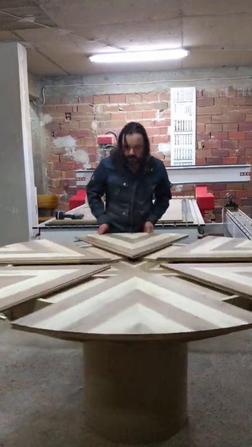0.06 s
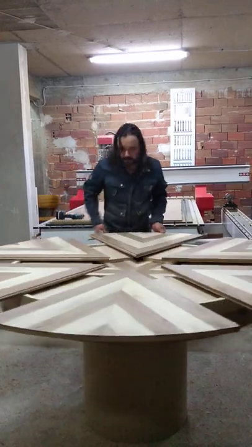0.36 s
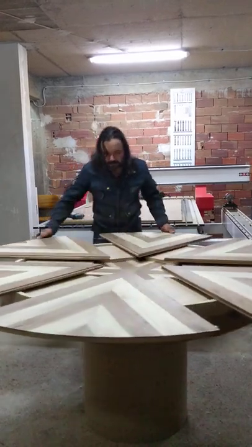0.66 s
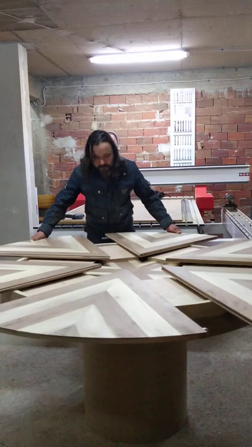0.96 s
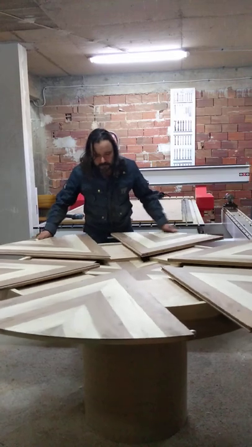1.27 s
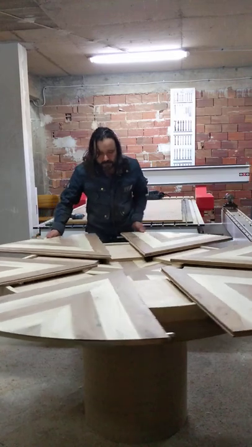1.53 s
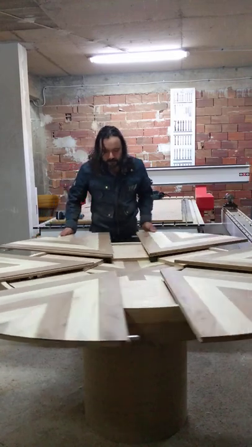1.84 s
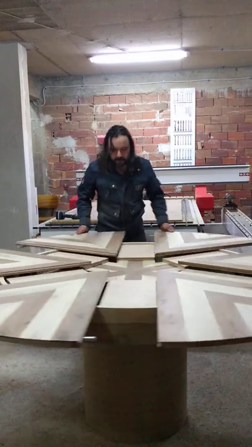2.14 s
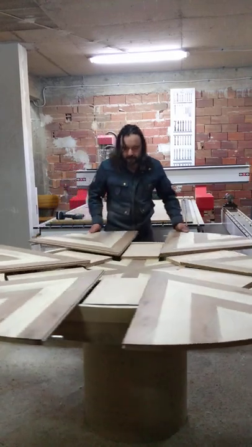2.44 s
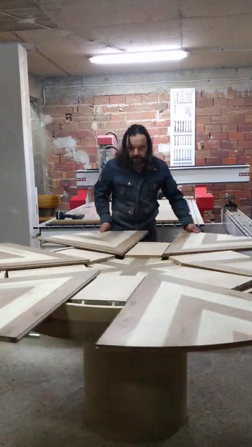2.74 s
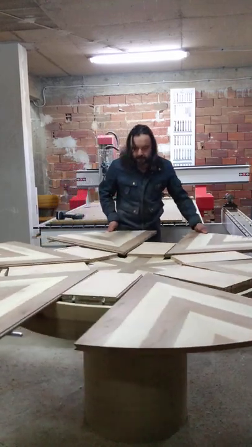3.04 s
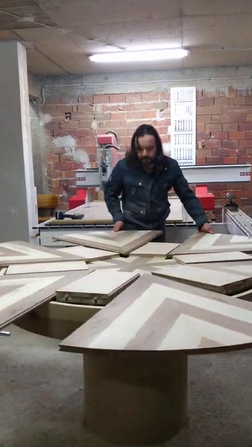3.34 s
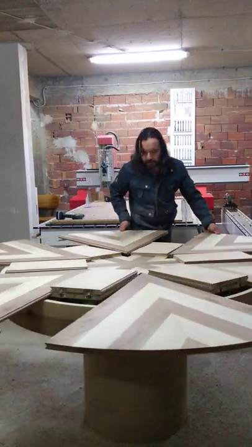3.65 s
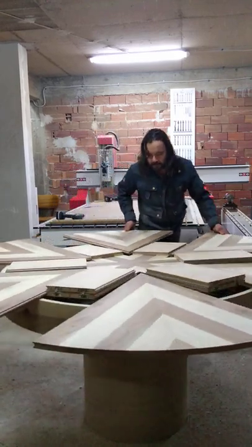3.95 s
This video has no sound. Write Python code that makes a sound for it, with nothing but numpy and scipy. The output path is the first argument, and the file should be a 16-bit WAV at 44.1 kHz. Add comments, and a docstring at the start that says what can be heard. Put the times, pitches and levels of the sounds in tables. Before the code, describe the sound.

Wooden table panels rumble and scrape as they are pushed apart and turned by hand.

```python
"""The runners of an expanding round table rumble as its wooden panels are pushed apart and turned by hand.
Small bumps ring the table's resonances and joints jolt it. Wood scrapes and hisses on wood, loose
panels knock, and the metal guides rasp, tick with grit and squeak faintly. It all sounds in a brick
workshop over quiet room noise, through two close microphones and a stereo widening circuit."""
import sys
import numpy as np
from scipy import signal
from scipy.fft import rfft, irfft
from scipy.io import wavfile
from scipy.ndimage import uniform_filter1d

SR = 44100
rng = np.random.default_rng(int(sys.argv[2]) if len(sys.argv) > 2 else 0)


def transcribe(signal):
    """Save signal, clipped to [-1, 1], as a 16-bit WAV file at the path in sys.argv[1]."""
    frames = np.atleast_2d(signal).T
    limited = np.clip(frames, -1, 1)
    pcm = np.round(limited * 32767).astype(np.int16)
    wavfile.write(sys.argv[1], SR, pcm)


N = 176400
T, HZ = np.arange(N) / SR, np.fft.rfftfreq(2 * N, 1 / SR)


def amp(db):
    """Decibels to gain."""
    return 10 ** (np.asarray(db) / 20)


def unit(x):
    """Scales to rms 1."""
    return x / np.sqrt(np.mean(x ** 2) + 1e-20)


def curve(points, hz=HZ):
    """Reads a table on a log-frequency axis."""
    f, value = np.transpose(points)
    return np.interp(np.log(hz + 1), np.log(f + 1), value)


def fader(points):
    """A level ride in dB as gain per sample."""
    return amp(np.interp(T, *np.transpose(points)))


def add(mix, start_s, sound):
    """Mixes a sound in at a time."""
    part = mix[max(round(start_s * SR), 0):][:len(sound)]
    part += sound[:len(part)]


def eq(x, response):
    """Filters by a frequency response."""
    return irfft(rfft(x, 2 * N) * response)[..., :N]


def colour(points):
    """Minimum-phase response of an EQ curve, scaled to rms 1."""
    log_gain = np.log(amp(curve(points, np.fft.rfftfreq(8192, 1 / SR))))
    mirrored = np.r_[log_gain, log_gain[-2:0:-1]]
    response = np.exp(np.conj(signal.hilbert(mirrored))[:len(log_gain)])
    impulse = irfft(response)[:len(log_gain)]
    return unit(rfft(impulse, 2 * N))


def grains(per_s, spread_db):
    """Random tiny impacts of uneven size from all round the table, as mid and side."""
    chance, size = rng.random((2, 2, N))
    hit, out = chance < per_s / SR, np.zeros((2, N))
    signed = 2 * size[hit] - 1
    accent = np.minimum(-np.log(abs(signed) + 1e-9), 4)
    out[hit] = np.sign(signed) * amp(spread_db * accent)
    return unit(out)


def wander(n, smooth_samples):
    """Smooth random drift of rms about 1."""
    return unit(uniform_filter1d(rng.standard_normal(SR), size=smooth_samples))[:n]


def bursts(events, attack_s, decay_s):
    """Envelope of short hits with a linear attack and an exponential decay."""
    out, t = np.zeros(N), T[:SR // 2]
    for start_s, db in events:
        add(out, start_s, amp(db) * np.minimum(t / attack_s, 1) * np.exp(-t / decay_s))
    return out


# tone of the noise bed (frequency [Hz], relative gain [dB])
ROOM_TONE_EQ = [(20, -19), (60, 14), (170, 11), (400, -2), (1000, -31.5), (2000, -16), (3800, -23),
                (6000, -33.5), (10500, -23.5), (14000, -23.5)]
HISS_HZ, HISS_HALF_WIDTH_HZ, HISS_BOOST_DB, FLUTTER_DB = 4470, 390, 24.5, 2.8
ROOM_TONE_DB = -67.5


def room_tone():
    """A low, steady bed of noise with a narrow band of hiss that flutters."""
    boost_db = HISS_BOOST_DB / (1 + ((HZ - HISS_HZ) / HISS_HALF_WIDTH_HZ) ** 2)
    air = amp(curve(ROOM_TONE_EQ))
    white = rng.standard_normal((2, N))
    flutter = amp(FLUTTER_DB * unit(uniform_filter1d(rng.standard_normal(N), size=1200)))
    hiss = flutter * eq(white, air * (amp(boost_db) - 1))
    return amp(ROOM_TONE_DB) * unit(eq(white, air) + hiss)


# reverb time of the workshop (frequency [Hz], T60 [s])
REVERB_TIME = [(100, 0.35), (1000, 0.14), (5000, 0.12), (14000, 0.41)]
PREDELAY_S, REVERB_DB = 0.00341, -7


def workshop(direct):
    """Direct sound plus a short, soft tail off the brick walls, fed from the mid signal."""
    hz, t, spectrum = signal.stft(rng.standard_normal((2, SR)), SR, nperseg=256)
    decay = amp(-60 * t / curve(REVERB_TIME, hz)[:, None])
    tail = signal.istft(spectrum * decay, SR, nperseg=256)[1][:, :SR] * (T[:SR] > PREDELAY_S)
    tail /= np.linalg.norm(tail, axis=1, keepdims=True)
    wet = signal.fftconvolve(direct[:1], tail, axes=1)[:, :N]
    return direct + amp(REVERB_DB) * wet


# faint squeak cues (time [s], length [s], pitch [Hz], level [dB])
SQUEAK_CUES = [(.79, .14, 2850, -79), (0.893, 0.072, 2710, -74.5), (0.994, 0.067, 3200, -74),
               (1.84, .06, 3330, -77), (2.604, 0.115, 3580, -74.5), (2.72, 0.21, 3550, -85),
               (2.853, 0.09, 3610, -72.5), (2.92, 0.156, 3480, -80.5)]
SQUEAK_WAVER, SQUEAK_SAG_HZ_PER_S = .009, 700


def guide_squeaks():
    """The guides stick and slip in thin whistles that waver and sag in pitch."""
    out = np.zeros(N)
    for start_s, length, hz, db in SQUEAK_CUES:
        n = int(length * SR)
        sag = SQUEAK_SAG_HZ_PER_S * (T[:n] - length / 2)
        pitch = hz * (1 + SQUEAK_WAVER * wander(n, smooth_samples=300)) - sag
        swell = np.sqrt(2 * np.hanning(n))
        add(out, start_s, amp(db) * swell * np.sin(2 * np.pi * np.cumsum(pitch) / SR))
    return out


# gritty tick cues (time [s], level [dB])
TICK_CUES = [(.005, -68), (.14, -66), (.19, -70), (.352, -68), (.52, -77), (.595, -71), (.86, -79),
             (1.155, -72), (1.408, -77), (1.512, -79), (1.66, -78), (1.735, -72), (1.968, -67),
             (2.512, -69), (2.595, -76), (3.262, -73), (3.805, -82), (3.895, -74.5)]
# bright tone of the grit (frequency [Hz], relative gain [dB])
TICK_EQ = [(20, -39), (2500, -18), (5500, -3.5), (8000, -3.5), (11000, -1), (14000, -10)]


def grit_ticks():
    """Grit in the guides crunches in little bursts of tiny impacts."""
    grit = grains(per_s=5000, spread_db=2)
    return eq(grit * bursts(TICK_CUES, attack_s=.012, decay_s=.042), colour(TICK_EQ))


# resonances of the metal guides (frequency [Hz], width [Hz], gain [dB])
GUIDE_MODES = [(2823, 820, -25), (4460, 340, -21)]
RASP_FOLLOW = 0.75  # dB of rasp per dB of rumble


def guide_rasp():
    """The metal guides rasp in narrow bands as the runners roll, riding the rumble's level."""
    grit = grains(per_s=4600, spread_db=2) * fader(RUMBLE_RIDE) ** RASP_FOLLOW
    bands = sum(amp(db) / (1 + 2j * (HZ - hz) / width) ** 2 for hz, width, db in GUIDE_MODES)
    return eq(grit, bands)


# a panel breaks free and rattles to rest, later ones catch lightly (time [s], clack [dB], thud [dB])
KNOCK_CUES = [(.087, -56.5, -67), (.102, -64, -62), (.123, -63, -58), (.154, -65.5, -60), (.186, -69, -65),
              (.258, -75, -67), (2.102, -70, -69), (2.175, -80, -70), (2.36, -73, -71), (3.745, -84, -85)]
# hollow tone of the panel (frequency [Hz], relative gain [dB])
CLACK_EQ = [(20, -52), (80, -34), (170, -9), (350, -2), (500, -3), (740, -1), (850, -2), (970, 5),
            (1120, -3), (1400, -7), (1900, -22), (4000, -42), (15000, -60)]
# dull tone of the frame (frequency [Hz], relative gain [dB])
THUD_EQ = [(20, -48), (80, -26), (150, -2), (260, -1), (400, 4), (470, -10), (600, -2), (760, -5),
           (1100, -20), (2000, -42), (15000, -70)]


def panel_knocks():
    """A loose panel strikes: a sharp clack of its own, then a softer thud of the frame beneath."""
    clack, thud = rng.standard_normal((2, 2, N))
    clack *= bursts([(s, db) for s, db, _ in KNOCK_CUES], attack_s=.00037, decay_s=.026)
    thud *= bursts([(s, db) for s, _, db in KNOCK_CUES], attack_s=.003, decay_s=.03)
    return eq(clack, colour(CLACK_EQ)) + eq(thud, colour(THUD_EQ))


# fader ride of the panels' scrape (time [s], level [dB])
SCRAPE_RIDE = [(0, -48.5), (.08, -50.5), (.11, -54), (.2, -48), (.45, -53.5), (.53, -57.5), (.8, -58.5),
               (1.12, -67.5), (1.53, -61.5), (1.72, -58.5), (1.95, -52.5), (2.2, -56), (2.52, -60),
               (2.62, -60.5), (2.84, -60), (3.15, -65), (3.6, -70.5), (4, -66)]
# woody tone of the scrape (frequency [Hz], relative gain [dB])
SCRAPE_EQ = [(20, -42), (90, -19.5), (250, 3.5), (470, -3.5), (600, -7.5), (680, -4), (780, -4), (860, -4),
             (950, -6.5), (1150, -7.5), (1350, -11), (1700, -15), (2300, -10.5), (4000, -41.5),
             (15000, -37.5)]
# fader ride of the dry surface rub (time [s], level [dB])
RUB_RIDE = [(0, -66), (.2, -66), (.43, -62.5), (.52, -70), (.9, -70), (1.1, -75.5), (1.55, -73.5),
            (1.92, -68), (2.35, -72), (2.55, -72), (3.05, -74), (3.3, -75.5), (3.7, -80), (4, -76.5)]
# airy tone of the rub (frequency [Hz], relative gain [dB])
RUB_EQ = [(20, -9), (1000, 0.5), (1900, -0.5), (2850, -1), (3800, -1), (5200, -4), (7000, -6.5),
          (10500, -10), (14000, -20.5)]
SCRAPE_TRIM_DB, RUB_TRIM_DB = -11.5, -1


def sliding_panels():
    """Wood grain catches and slips: a hollow scrape in the panels and a dry hiss at the surface."""
    scrape = eq(grains(per_s=4600, spread_db=2) * fader(SCRAPE_RIDE), colour(SCRAPE_EQ))
    rub = eq(grains(per_s=7100, spread_db=2) * fader(RUB_RIDE), colour(RUB_EQ))
    return amp(SCRAPE_TRIM_DB) * scrape + amp(RUB_TRIM_DB) * rub


# runners jolting over joints (time [s], half length [s], level [dB], pitch [Hz])
JOLT_CUES = [(.015, 0.013, -56, 283), (.228, 0.09, -35.5, 235.2), (.447, 0.025, -37, 276),
             (.58, 0.042, -45, 232), (.683, 0.069, -39, 304), (.89, .042, -49, 204), (.99, 0.022, -49, 202),
             (1.42, 0.029, -51.5, 313), (1.9, 0.049, -45, 163), (1.96, 0.041, -41.5, 217.3),
             (2.17, 0.039, -49, 548), (2.315, 0.039, -39.5, 261), (2.39, 0.076, -40.5, 171.3),
             (2.6, 0.047, -38.5, 169), (2.835, 0.041, -42, 163.4), (2.842, 0.05, -43.5, 322),
             (3.05, 0.018, -55, 175), (3.21, .06, -57.5, 189), (3.735, 0.041, -54, 160)]
JOLT_DRIFT_HZ = 10


def runner_jolts():
    """A runner jolts over each joint: a brief low shudder around one pitch."""
    out = np.zeros(N)
    for start_s, half_length, db, hz in JOLT_CUES:
        t = np.arange(0, 2 * half_length, 1 / SR)
        pitch = hz + JOLT_DRIFT_HZ * wander(len(t), smooth_samples=200)
        peak_s = half_length / 3
        swell = t / peak_s * np.exp(1 - t / peak_s)
        add(out, start_s, amp(db) * swell * np.sin(2 * np.pi * np.cumsum(pitch) / SR))
    return out


# fader ride of the rumble over two pushes (time [s], level [dB])
RUMBLE_RIDE = [(0, -44.5), (.11, -44.5), (.3, -45.5), (.47, -45.5), (.54, -49.5), (.75, -50.5),
               (.95, -58.5), (1.12, -62), (1.3, -61.5), (1.5, -56), (1.73, -54), (1.82, -47.5),
               (1.95, -45.5), (2.4, -47.5), (2.52, -50), (2.6, -47.5), (2.72, -48.5), (2.88, -49),
               (2.98, -52), (3.08, -54), (3.11, -62), (3.56, -66.5), (4, -63)]
# table resonances (frequency [Hz], width [Hz], relative gain closed [dB], relative gain open [dB])
TABLE_MODES = [(59, 14, -19, -22), (93, 13, -11, -9.5), (127, 12, 2.5, 0), (165, 11, 5.5, 9.5),
               (233, 20, 5.5, 0), (298, 10, 1.5, -7), (334, 22, -6, -2), (390, 18, -6, -9),
               (534, 22, -12, -7), (610, 60, -14, -13), (755, 50, -18, -18), (945, 50, -16, -25)]
# broad low body under the resonances (frequency [Hz], relative gain [dB])
BODY_EQ = [(20, -47.5), (80, -38.5), (140, -4.5), (250, -9), (370, -13), (480, -19), (1000, -54),
           (3000, -102)]
OPENING_START_S, OPENING_END_S = 0.78, 2.2
BUMPS_PER_S, BUMP_SPREAD_DB = 700, 1.5
RING_TRIM_DB, BODY_TRIM_DB = 0.5, -3.5


def runner_rumble():
    """Small bumps under the runners ring the table, whose tone shifts as the panels move out."""
    opened = np.interp(T, [OPENING_START_S, OPENING_END_S], [0, 1])
    bumps, ring = grains(BUMPS_PER_S, BUMP_SPREAD_DB), 0
    for k, (hz, width, closed_db, open_db) in enumerate(TABLE_MODES):
        # a second, broad band-pass steepens the skirts of each resonance
        resonator = [np.concatenate(signal.iirpeak(hz, q, SR)) for q in (hz / width, 2)]
        gain = amp(closed_db) * (1 - opened) + amp(open_db) * opened
        ring = ring + (-1) ** k * gain * signal.sosfilt(resonator, bumps)
    body = eq(grains(BUMPS_PER_S, BUMP_SPREAD_DB), colour(BODY_EQ))
    return fader(RUMBLE_RIDE) * (amp(RING_TRIM_DB) * unit(ring) + amp(BODY_TRIM_DB) * unit(body))


# stereo width at the microphones (frequency [Hz], side gain [dB])
SIDE_EQ = [(40, 6.5), (90, -1), (160, -15), (250, -13), (340, -5.5), (450, -6), (620, -7.5), (1000, -1),
           (1500, 3), (2300, -2.5), (4300, 1), (14000, -0.5)]


def scene():
    """The table in the workshop over room tone, as left and right at two close microphones."""
    table = runner_rumble() + sliding_panels() + guide_rasp() + panel_knocks() + grit_ticks()
    table[0] += runner_jolts() + guide_squeaks()  # mid only: dead centre
    mid, side = workshop(table) + room_tone()
    side = eq(side, amp(curve(SIDE_EQ)))
    return np.array([mid + side, mid - side])


# microphone imbalance (frequency [Hz], left over right [dB])
MIC_BALANCE = [(40, -7), (170, -0.5), (500, -2.5), (1200, 0.5), (3000, -3), (5000, 2), (8000, 0),
               (11000, 3.5), (14000, 1)]
# opposite channel that the widener subtracts (frequency [Hz], share [0-1])
CROSSFEED = [(20, 0.58), (2000, 0.83), (3200, 0.57), (5200, 0.38), (7000, 0.29), (9000, 0.05),
             (14000, 0.01)]
LEFT_LEAD_S, CROSSFEED_DELAY_S, HIGH_CUT_HZ = .000015, 21 / SR, 14200


def record(dry):
    """Microphone imbalance, widening by delayed cross-feed, then a steep high cut."""
    left_over_right = amp(curve(MIC_BALANCE)) * np.exp(2j * np.pi * HZ * LEFT_LEAD_S)
    mics = eq(dry, left_over_right ** np.array([[.5], [-.5]]))  # half to each channel
    crossfeed = np.clip(curve(CROSSFEED), 0, 1) * np.exp(-2j * np.pi * HZ * CROSSFEED_DELAY_S)
    wide = mics - eq(mics[::-1], crossfeed)
    high_cut = signal.firwin(511, HIGH_CUT_HZ, window=("kaiser", 9), fs=SR)
    return signal.oaconvolve(wide, high_cut[None], "same")


dry = scene()
out = record(dry)
transcribe(out)
```